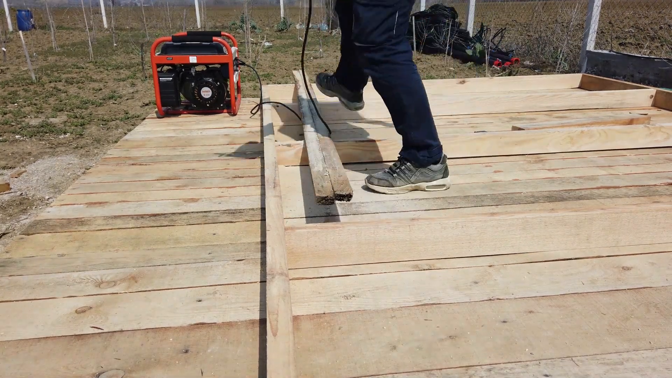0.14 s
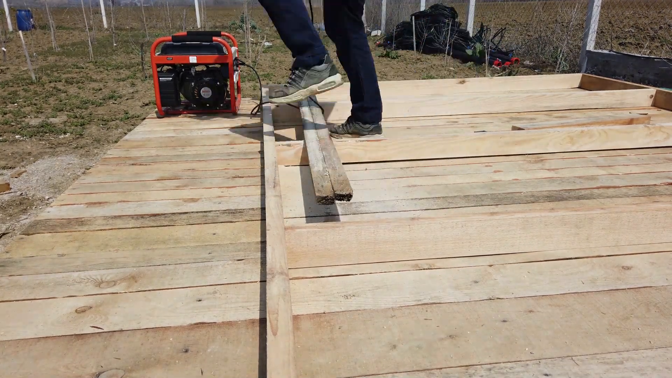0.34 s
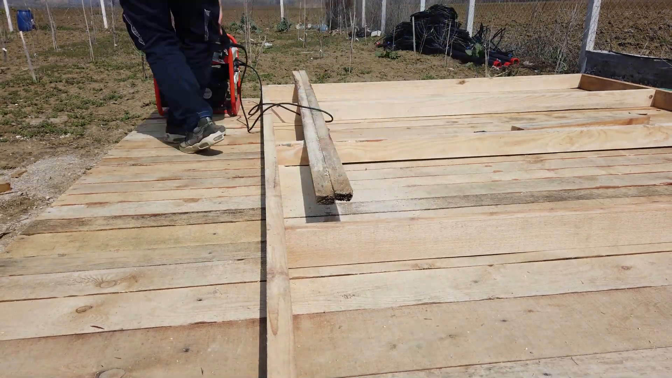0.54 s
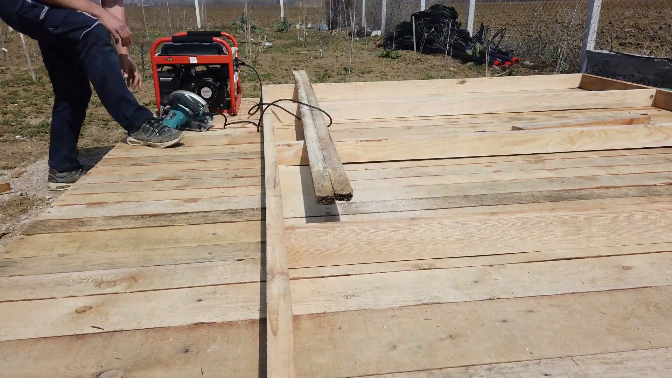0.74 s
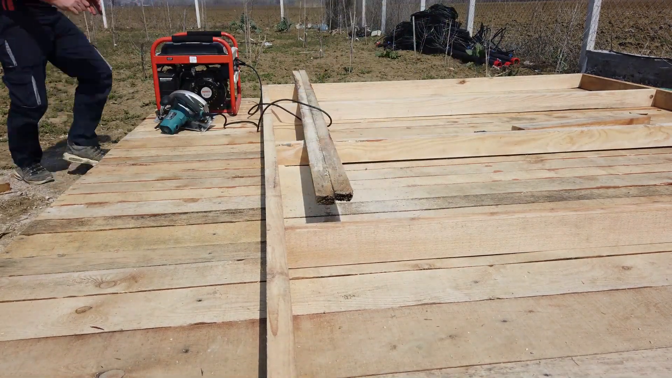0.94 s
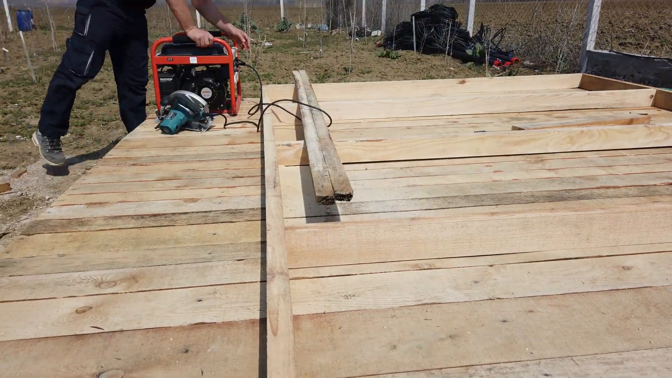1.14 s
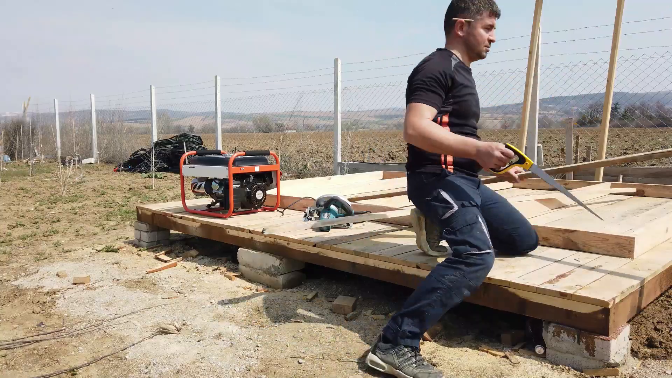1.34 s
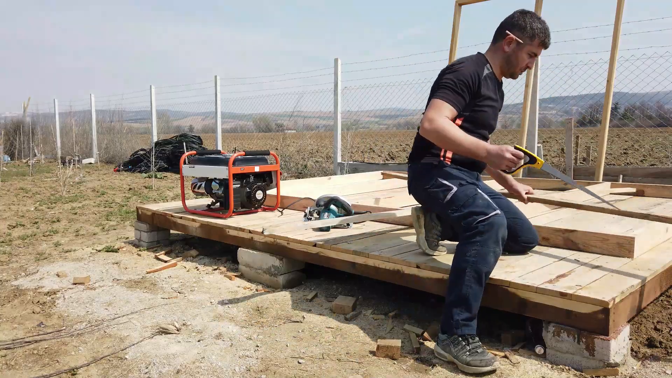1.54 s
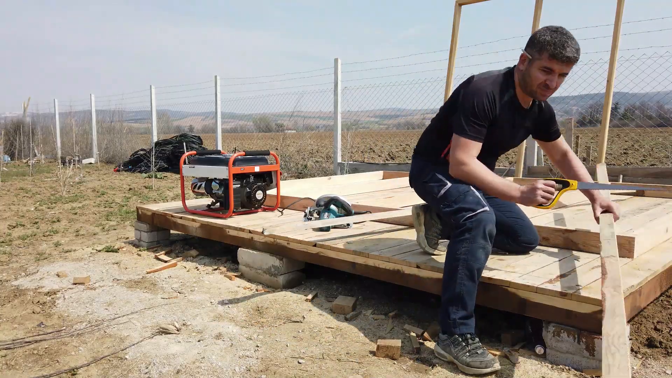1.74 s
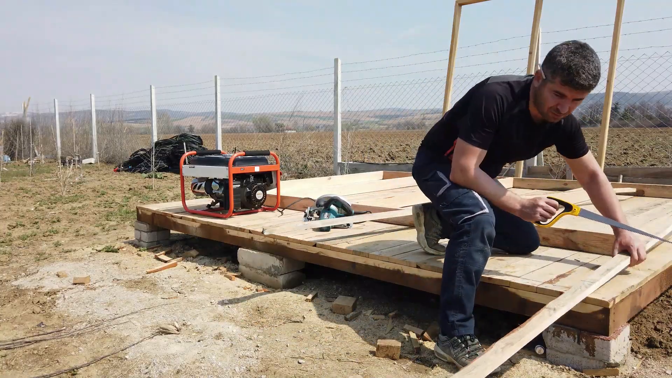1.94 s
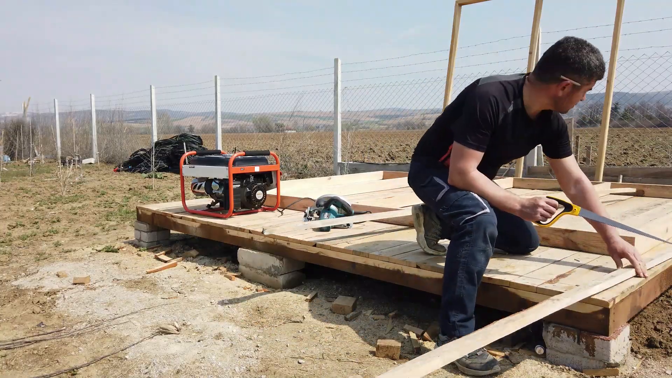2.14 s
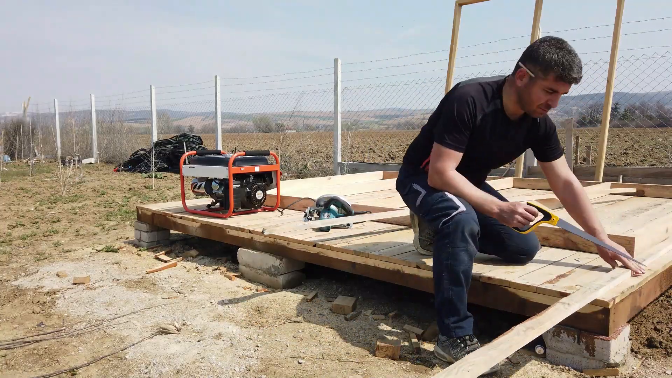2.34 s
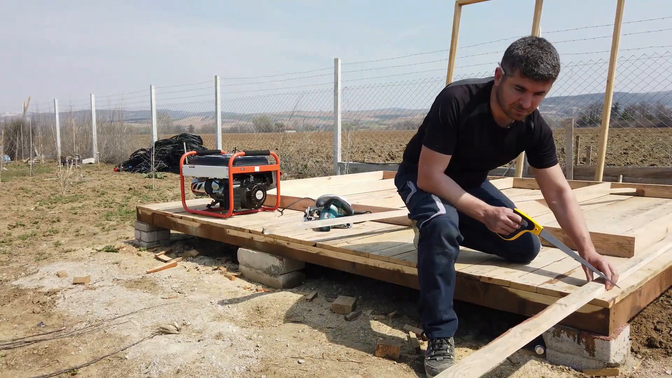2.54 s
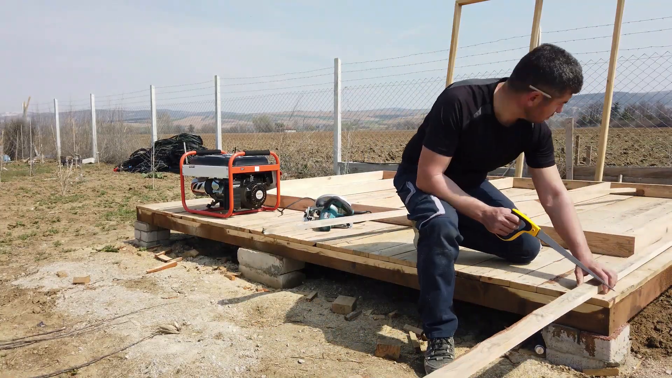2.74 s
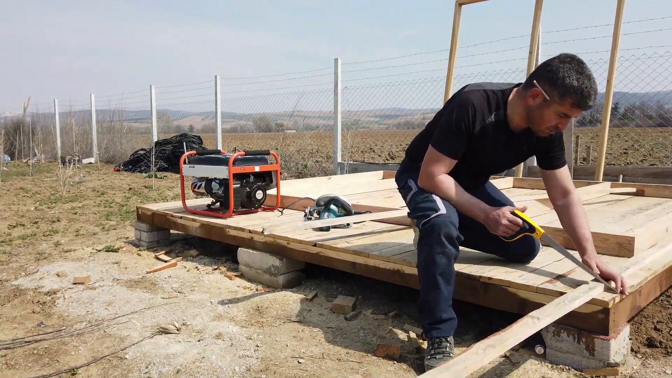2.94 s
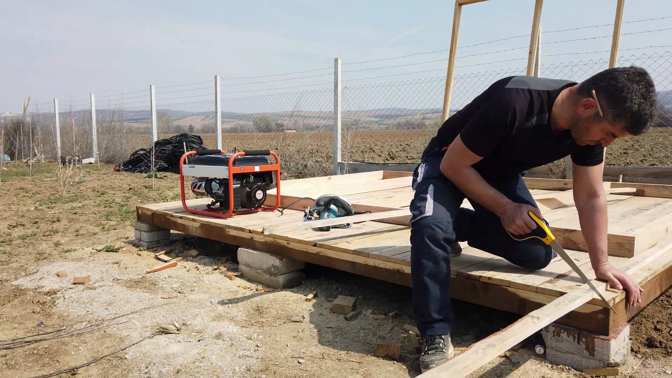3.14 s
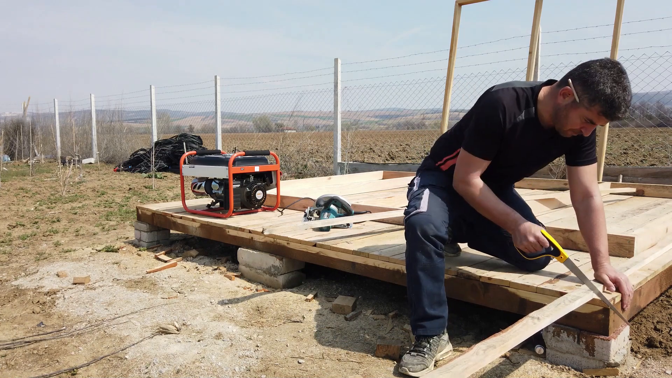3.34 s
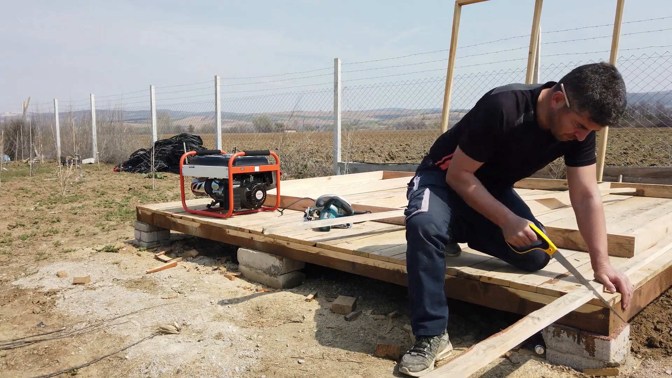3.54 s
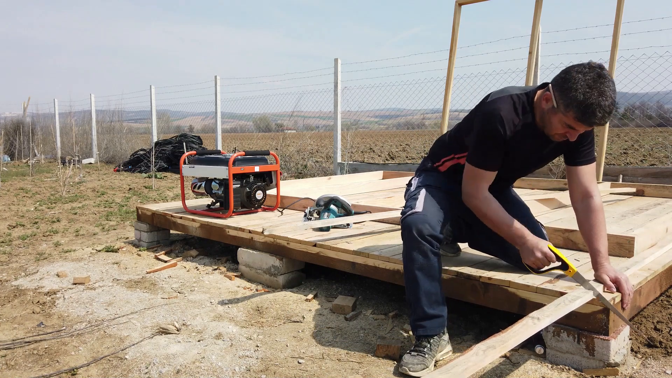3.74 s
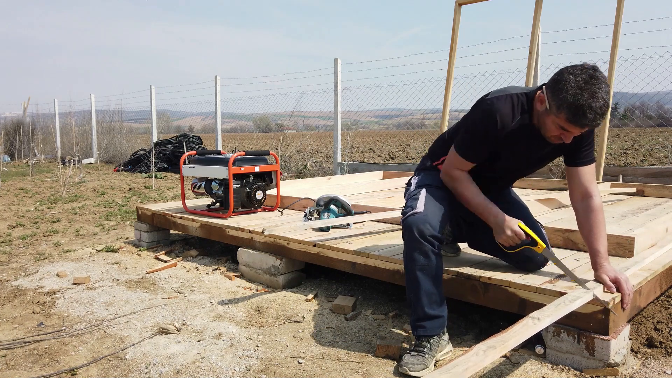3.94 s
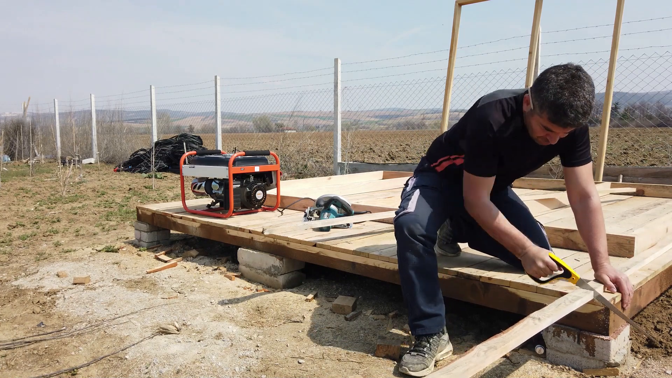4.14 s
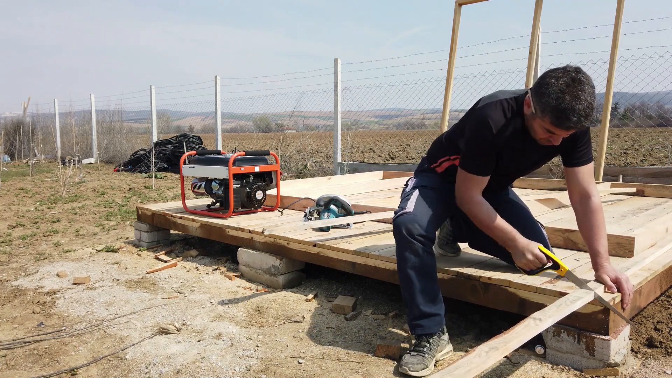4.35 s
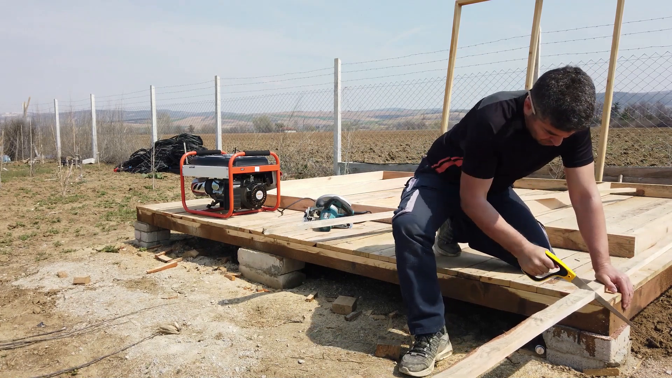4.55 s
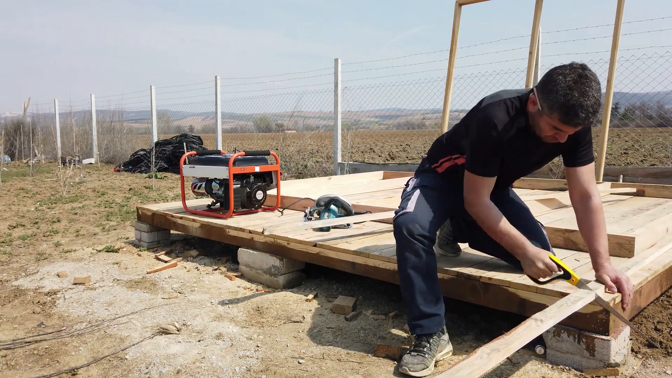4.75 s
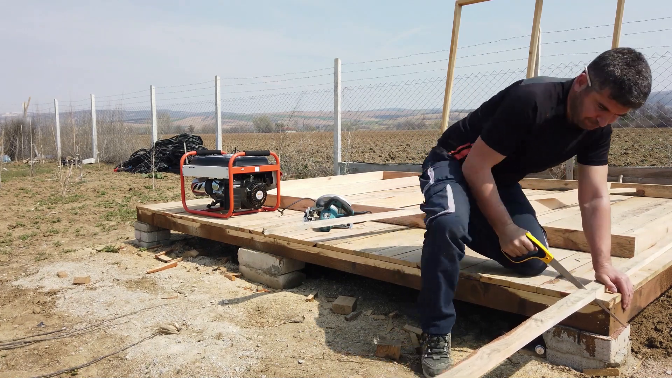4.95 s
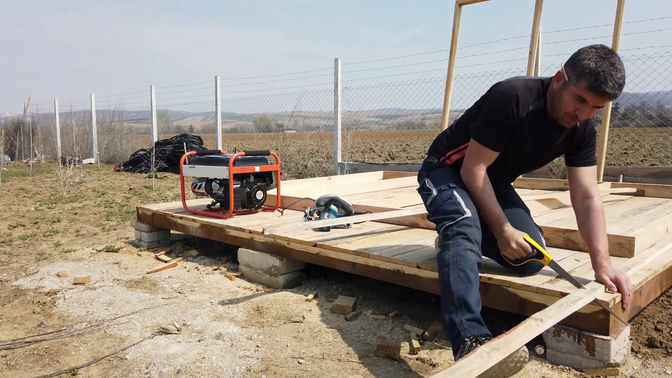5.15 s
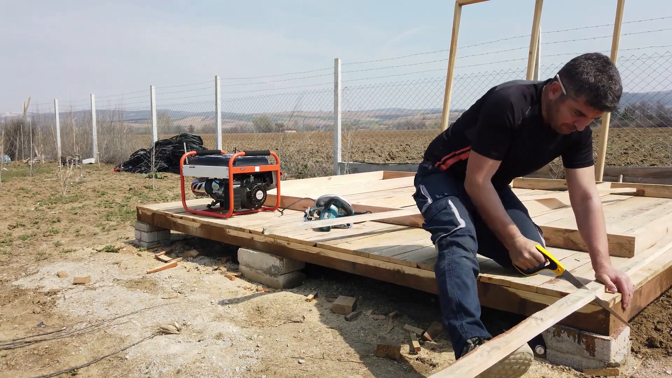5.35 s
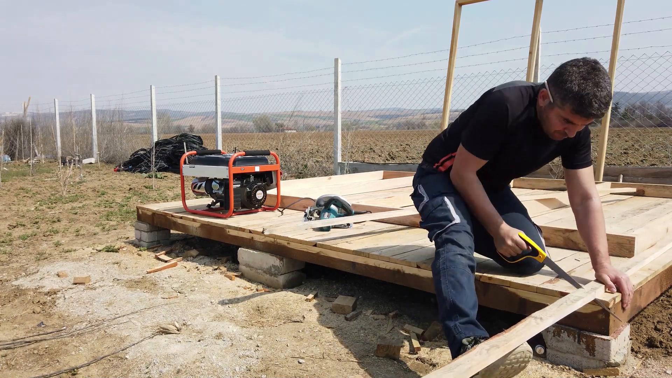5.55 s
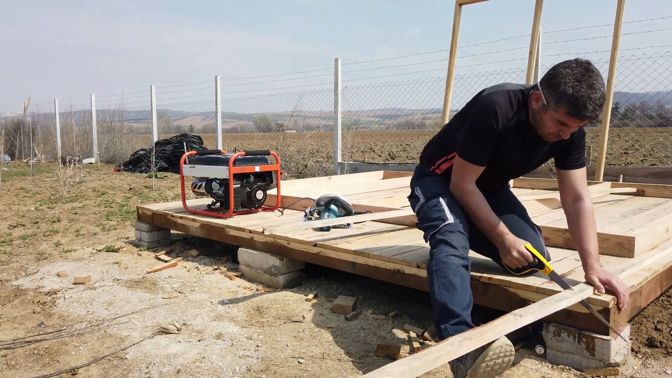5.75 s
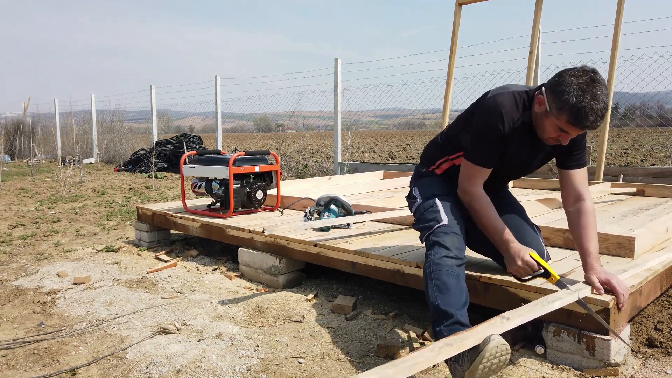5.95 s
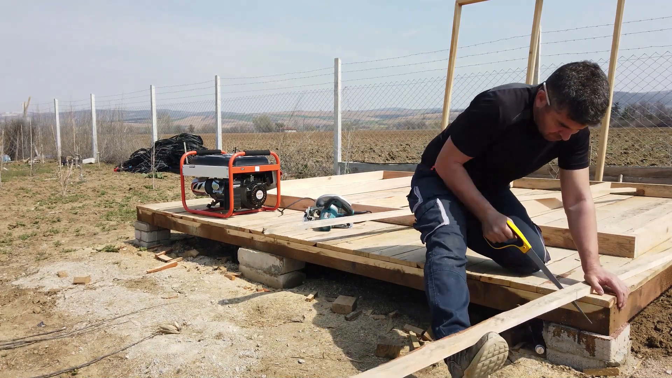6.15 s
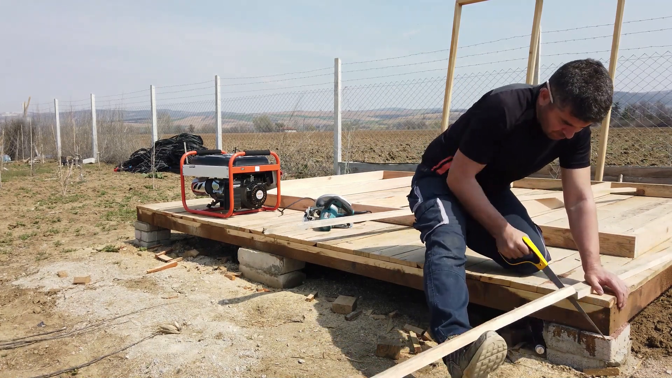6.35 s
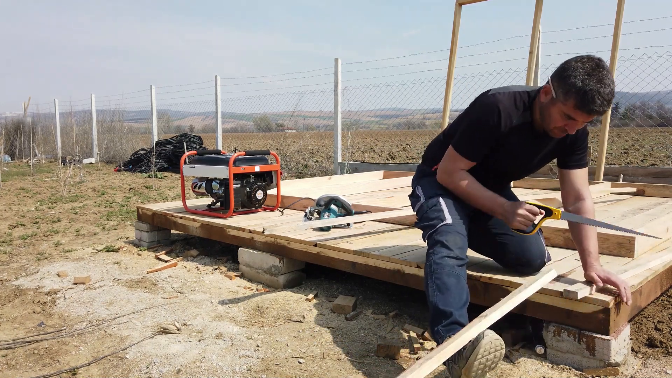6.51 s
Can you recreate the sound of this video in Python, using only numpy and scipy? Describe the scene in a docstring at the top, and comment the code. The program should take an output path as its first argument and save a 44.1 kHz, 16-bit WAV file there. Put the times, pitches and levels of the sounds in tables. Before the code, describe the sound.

Footsteps and a tool set down on wooden planks sound over a swelling generator burr for about a second. It cuts out, leaving faint wind and a very distant engine drone. Knocks and a small scrape of timber come next, then fast handsawing, about twelve strokes a second, coarse pushes and higher singing pulls. A stumbling pause with dull foot thumps, a last hollow-sounding burst, a crack and a small tick. Dry outdoor space.

```python
"""Handsawing beside a petrol generator

A saw cuts a board on a deck: its teeth pluck the wood, with loud rasping pushes and thin singing pulls.
A petrol generator hums first, built from harmonics and throbbing noise; it swells and is cut off.
A man steps over the planks, lays the board down and later saws through: short blows ring the timber.
His pause, shifting foot and sliding board are shaped noise; the dragged board sings.
Open air adds a low rumble of breeze, a faint hiss and a far engine's drone that sinks in pitch.
"""
import sys
import numpy as np
from scipy import signal
from scipy.fft import rfft, irfft, next_fast_len
from scipy.io import wavfile
from scipy.ndimage import map_coordinates

SR = 44100
rng = np.random.default_rng(int(sys.argv[2]) if len(sys.argv) > 2 else 0)


def master_out(mix):
    """Clip the mix to full scale and print it as 16-bit PCM to the path in sys.argv[1]."""
    frames = np.transpose(np.atleast_2d(mix))
    ceiling = np.clip(frames, -1, 1)
    pcm = np.round(ceiling * 32767).astype(np.int16)
    wavfile.write(sys.argv[1], SR, pcm)


N = 290178
TIME = np.arange(N) / SR
SIZE = next_fast_len(N + SR // 2, real=True) // 2 * 2  # padded length for filtering
HZ = np.fft.rfftfreq(SIZE, 1 / SR)
TOP_HZ = 16000

# Levels in the tables are relative: the functions below may add further gain.
# Saw strokes, a push and the pull back.
# Each row: middle of the push in seconds, push level in dB, pull level in dB, tooth tone of the pull in dB.
STROKES = [(3.322, -48, -51.5, -22), (3.4, -41.5, -35.5, -10), (3.471, -36.5, -38.5, -18),
           (3.54, -32.5, -40, -15), (3.618, -31.5, -35.5, -12), (3.698, -30.5, -39, -10),
           (3.776, -29, -39.5, -10), (3.857, -27.5, -38.5, -11), (3.938, -27.5, -42, -17),
           (4.024, -26.5, -42.5, -14), (4.109, -29, -41, -15), (4.191, -28, -42.5, -11),
           (4.271, -26, -43, -12), (4.359, -30, -42.5, -16), (4.458, -28, -43, -18),
           (4.561, -27.5, -43, -16), (4.665, -28, -40.5, -14), (4.772, -28, -40.5, -9),
           (4.875, -31, -40, -10), (4.983, -44.5, -74, -20), (5.365, -49, -48.5, -20),
           (5.45, -40.5, -49.5, -20), (5.544, -33, -42.5, -20), (5.628, -30.5, -51.5, -20),
           (5.725, -62, -82, -20), (5.814, -48.5, -67.5, -20), (5.918, -47, -48.5, -20),
           (5.997, -36.5, -41.5, -20), (6.073, -28.5, -41, -16), (6.148, -26.5, -36.5, -10),
           (6.231, -25.5, -38, -11), (6.346, -33.5, -45.5, -20)]
# Colour of the pushes, then of the pulls. Each row: frequency in Hz, level in dB.
PUSH_COLOUR = [(100, -45.5), (420, -20), (540, -10), (640, -4.5), (1100, -6), (2200, -6), (2750, -13.5),
               (4200, -7.5), (7000, -12), (8500, -18), (11000, -16.5), (12200, -22), (15800, -31.5)]
PULL_COLOUR = [(100, -24.5), (400, -21), (800, -8.5), (1000, -6), (1400, -6.5), (2500, -11), (4200, -10.5),
               (5800, -14), (7000, -9.5), (8500, -20), (11000, -18.5), (15800, -39)]
# Resonances of the board and the blade, first in a fresh cut and then in a deep one.
# Each row: frequency in Hz, width in Hz, lift in dB, before the scatter from stroke to stroke.
BOARD_FRESH = [(690, 60, 13), (948, 70, 7), (1030, 99, 3.5), (1283, 65, 10.5), (1687, 130, 14.5),
               (1813, 27, 5.5), (2104, 175, 10), (2477, 120, 11.5), (3130, 290, 10), (4180, 110, 6.5),
               (5050, 150, 2)]
BOARD_DEEP = [(579, 76, 14), (683, 55, 21), (890, 34, 10), (1150, 130, 4.9), (1393, 104, 11.4),
              (2106, 108, 15), (2215, 70, 6), (2970, 340, 13), (3990, 82, 8.1), (4910, 400, 8),
              (9100, 460, 8.7)]
BLADE_FRESH = [(710, 210, 4.2), (1020, 140, 2.4), (2134, 106, 18.8), (2930, 31, 3.1), (3980, 390, 4.5)]
BLADE_DEEP = [(690, 79, 5), (1040, 100, 6.2), (2120, 180, 2.5), (2983, 190, 8), (3730, 350, 8),
              (5000, 500, 6)]
# The board loosens between these two times, in seconds.
LOOSENING = (5.62, 6.09)
# How sharply the teeth bite. Each row: time in seconds, treble level in dB.
KEENNESS = [(3.3, -3.5), (3.7, -.3), (4.1, .8), (4.4, 2.8), (4.9, 2), (5.5, 2.5), (6.3, -2)]
PUSH_S, LIGHT_DB, LINGER_S_PER_DB = .052, -34, .0019  # pushes lighter than LIGHT_DB last longer
PULL_AT, PULL_SHARE, SLOWEST_S = .495, .45, .135  # pull's middle and length per cycle; longest cycle
LATE_PULL_SHARE = .62  # in a deep cut the blade rubs for longer
DETUNE, RING_SCATTER_DB = .009, 1.6  # the blade sits differently in the cut on every stroke

# The generator's hum. Each row: multiple of the hum pitch, level in dB.
HUM_HARMONICS = [(1, -6.5), (2, 3.5), (3, -6.5), (4, 0), (5, 1.5), (6, -3), (7, -9), (8, -13), (9, -18.5),
                 (10, -40.5), (11, -8.5), (12, -10), (13, -10.5), (14, -22.5), (15, -27), (16, -20),
                 (17, -12.5), (18, -8.5), (19, -12), (20, -21.5)]
# Whine of its alternator. Each row: multiple of the hum pitch, level in dB.
WHINE_HARMONICS = [(18, -9), (27, -4), (28, -7), (33, 0), (34, -8), (35, 1), (36, -3), (37, -3), (38, -7),
                   (45, -10), (52, -8), (53, -12)]
# Noise of its cooling air. Each row: frequency in Hz, level in dB.
FAN_COLOUR = [(30, -12), (80, -9), (180, 2), (350, 0.5), (560, -3.5), (800, -4), (1050, -12.5),
              (1400, -14.5), (2200, -9), (3500, -6.5), (5200, -6.5), (6600, -8), (10000, -10.7),
              (15800, -13.5)]
# Resonances of its casing. Each row: frequency in Hz, width in Hz, lift in dB.
CASING_RESONANCES = [(830, 70, 2), (1370, 150, 3), (1570, 70, 1), (2720, 220, 2.5), (4250, 250, 6),
                     (5200, 630, 7.5), (7720, 130, 7), (13380, 500, 1.5)]
# Swelling of the hum, then of the casing noise and whine. Each row: time in seconds, level in dB.
HUM_SWELL = [(0, -59), (.15, -55.5), (.3, -53), (.44, -52.5), (.49, -47.5), (.6, -47), (.68, -44),
             (.85, -44), (.97, -42.5), (1.2, -42.5)]
CASING_SWELL = [(0, -57), (.15, -54.5), (.4, -52), (.65, -50.5), (.82, -49.5), (.87, -47), (1.2, -46.3)]
HUM_HZ = 151.3  # average pitch
HUM_END, HUM_FADE_S = 1.198, .04  # cut-off time, and seconds to fall by 60 dB

# Steps and a tool set down on the deck. Each row: start in seconds, level in dB, brightness in Hz.
STEPS = [(.134, -43.5, 2200), (.235, -46, 1100), (.447, -36.5, 1100), (.707, -36, 900), (.7135, -40, 800),
         (.7283, -28, 1400), (.7303, -27.5, 1100), (.7412, -21.5, 1900), (.7445, -30, 2500),
         (.751, -34, 900), (1.168, -36, 347), (1.205, -39.5, 890)]
# Knee, board and blade knocking on timber. Each row: start in seconds, level in dB, brightness in Hz.
KNOCKS = [(1.394, -35.5, 650), (1.3943, -41.5, 2200), (1.42, -55, 8000), (1.432, -51, 1500),
          (1.498, -53, 8000), (1.909, -45.5, 6500), (1.925, -51, 3060), (2.2376, -29.5, 3100),
          (2.2425, -31.5, 2720), (2.283, -43, 1565), (2.396, -55, 520), (3.003, -56, 850),
          (3.05, -52.5, 760), (3.166, -49, 990), (3.287, -50, 1200), (3.292, -41, 1570),
          (5.277, -63.5, 3000), (6.455, -36.5, 6550), (6.456, -47, 756)]
# The last fibres crack and free the offcut. Each row: start in seconds, level in dB, brightness in Hz.
CRACKS = [(6.3335, -34, 1500), (6.342, -29, 1400), (6.358, -33, 1300)]
# Resonances of the deck, the timber and the offcut. Each row: frequency in Hz, width in Hz, lift in dB.
DECK_RESONANCES = [(300, 53, 5), (760, 160, 7), (1370, 190, 10), (1630, 90, 8.5), (3010, 250, 6)]
TIMBER_RESONANCES = [(500, 90, 2.5), (1000, 120, 5), (1190, 38, 10), (1633, 82, 8), (2095, 220, 10.5),
                     (3790, 300, 11), (4280, 300, 6)]
OFFCUT_RESONANCES = [(608, 57, 13), (910, 30, 22), (1110, 68, 17)]

# Slides of the board and a shoe. Each row: middle in seconds, length in seconds, level in dB.
SCUFFS = [(1.95, .05, -71), (2.03, .06, -79), (2.635, 0.096, -63.5), (2.94, 0.064, -62.5),
          (5.07, .028, -66)]
# The dragged board sings. Each row: middle in seconds, length in seconds, level in dB.
BOARD_DRAG = [(2.685, .125, -72.5)]
# The man shifts his weight on the soil. Each row: middle in seconds, length in seconds, level in dB.
SHIFTS = [(3.19, 0.06, -59), (3.95, 0.28, -54), (4.18, 0.087, -49), (5.13, .18, -54.5), (5.24, .08, -46.5),
          (5.395, .11, -43.5), (5.48, .08, -51)]
# Colour of the scrapes, then of the foot's thumps. Each row: frequency in Hz, level in dB.
SCUFF_COLOUR = [(290, -21), (500, 2.5), (1240, -1.5), (1910, -5), (2530, -1), (3270, -10), (5620, -12),
                (15000, -19)]
THUMP_COLOUR = [(30, -24), (65, -1), (120, -1), (300, -5), (450, -15), (700, -31), (1500, -74)]
# Resonances of the dragged board. Each row: frequency in Hz, width in Hz, lift in dB.
DRAG_RESONANCES = [(2510, 70, 13), (3720, 76, 4)]
LUMPS_PER_S, LUMPY_DB = 35, 1.5  # a shifting foot lands unevenly

# Strength of the breeze. Each row: time in seconds, level in dB.
BREEZE_SWELL = [(0, -65.5), (.85, -59), (1.6, -68.5), (2.4, -65), (2.8, -69), (3.4, -61.5), (4.7, -62),
                (5.3, -59.5), (5.9, -62), (6.58, -58)]
# Colour of the breeze's rumble, then of the open-air hiss. Each row: frequency in Hz, level in dB.
RUMBLE_COLOUR = [(12, -50), (20, -24.5), (76, -11), (113, 1), (136, -5), (275, -5.5), (347, -12.5),
                 (387, -11), (431, -16.5), (600, -23.5), (783, -27), (1400, -38), (1950, -69.5),
                 (3300, -120)]
AIR_COLOUR = [(300, -8), (1000, 0), (2500, -3), (6000, -7), (9000, -10), (11300, -7), (13000, -11),
              (15800, -12)]
# Drone of a far engine. Each row: time in seconds, base pitch in Hz, level in dB.
DRONE = [(1.2, 198.4, -72), (1.7, 193.7, -82.5), (2.301, 186.3, -75.5), (3.0, 188.6, -89.5)]


def amp(db):
    """Decibels to gain."""
    return 10 ** (np.asarray(db) / 20)


def unit(x):
    """Scale to an rms (average strength) of 1."""
    return x / np.sqrt(np.mean(x ** 2) + 1e-20)


def curve(rows):
    """Join (seconds, value) rows into one value per sample."""
    return np.interp(TIME, *np.transpose(rows))


def wobble(rate):
    """A smooth random curve with rate knots a second."""
    knots = rng.standard_normal(int(N * rate / SR) + 4)
    fine = np.arange(0, len(knots) - 1, 1 / 8)
    return np.interp(TIME * rate, fine, map_coordinates(knots, [fine]))


def shape(points, peaks=(), hz=HZ):
    """Gain of a smooth spectrum with resonances standing on it."""
    f, db = np.transpose(points)
    db = np.interp(np.log(hz + 1), np.log(f), db)
    for centre, width, lift in peaks:
        db = db + lift / (1 + (2 * (hz - centre) / width) ** 2)
    return amp(db)


def ring(x, gain):
    """Filter of unit power in which resonances ring only after each impulse."""
    size = 2 * (len(gain) - 1)
    # folding the cepstrum forward in time gives the filter with the earliest response
    cepstrum = irfft(np.log(np.maximum(unit(gain), 1e-6)))
    cepstrum[1:size // 2] *= 2
    cepstrum[size // 2 + 1:] = 0
    response = np.exp(rfft(cepstrum))
    return irfft(rfft(x, size) * response, size)[..., :x.shape[-1]]


def noise(gain, side_db):
    """Stereo noise of rms 1; side_db rows give its width as side minus mid in dB at each Hz."""
    width = np.array([np.ones(len(HZ)), shape(side_db)])
    mid, side = irfft(rfft(rng.standard_normal((2, SIZE))) * gain * width)[:, :N]
    return unit(np.array([mid + side, mid - side]))


def gestures(rows, power):
    """Loudness of movements that start and end at rest."""
    level = np.zeros(N)
    for middle, length, db in rows:
        inside = np.abs(TIME - middle) < length / 2
        swell = np.abs(np.cos(np.pi * (TIME[inside] - middle) / length))
        level[inside] += amp(db) * swell ** power
    return level


def outdoors(x, echo_db=-18, t60=.17, wide_t60=.0067):
    """The deck and ground scatter a brief echo; mostly the treble differs between the ears."""
    t = np.arange(SR // 6) / SR
    decay = amp(-60 * t / np.array([[t60], [wide_t60]]))
    tails = rng.standard_normal((2, len(t))) * decay * (t > .001)
    tails = tails / np.linalg.norm(tails, axis=1, keepdims=True)
    echo, wide = signal.fftconvolve(x[None], tails, axes=1)[:, :N]
    width = shape([(250, -30.5), (1000, -52), (2000, -36.5), (4000, -13.5), (8000, -3), (12000, 3.5)])
    side = irfft(rfft(wide * wobble(400), SIZE) * width)[:N]
    mid = x + amp(echo_db) * echo
    return np.array([mid + side, mid - side])


def saw(edge_hz=2600, snag_db=1.2, chirp_db=-1.5):
    """Pushes bite and shake the board; on pulls the teeth skate in a rising chirp and the blade sings."""
    forward, backward = arm()
    sing_db = np.interp(TIME, backward[:, 0], np.array(STROKES)[:, 3])
    bite = teeth(forward, first_hz=600, fastest_hz=1280, fastest_at=.68, scatter=.11,
                 uneven_db=4.6, tear_db=-7.5, tone_db=-26)
    skate = teeth(backward, first_hz=800, fastest_hz=1230, fastest_at=.95, scatter=.04,
                  uneven_db=5.0, tear_db=-3.5, tone_db=sing_db + chirp_db)
    pushes = resonate(bite, forward, PUSH_COLOUR, BOARD_FRESH, BOARD_DEEP,
                      fresh_db=-1.5, deep_db=-2, power=2.5, sag=.015)
    pulls = resonate(skate, backward, PULL_COLOUR, BLADE_FRESH, BLADE_DEEP,
                     fresh_db=-1.5, deep_db=-2.5, power=1.1, sag=.025)
    cut = pushes + pulls
    dull = signal.sosfiltfilt(signal.butter(2, edge_hz, fs=SR, output="sos"), cut)
    treble_gain = amp(curve(KEENNESS) + snag_db * wobble(110))
    return outdoors(dull + treble_gain * (cut - dull))


def arm():
    """Pushes and pulls as (middle s, length s, dB); a pull falls about halfway to the next push."""
    s, push_db, pull_db, _ = np.transpose(STROKES)
    cycle = np.minimum(np.diff(s, append=np.inf), SLOWEST_S)
    push_s = PUSH_S + LINGER_S_PER_DB * np.maximum(LIGHT_DB - push_db, 0)
    share = np.interp(s, LOOSENING, [PULL_SHARE, LATE_PULL_SHARE])
    forward = np.transpose([s, push_s, push_db])
    backward = np.transpose([s + PULL_AT * cycle, share * cycle, pull_db])
    return forward, backward


def teeth(strokes, first_hz, fastest_hz, fastest_at, scatter, uneven_db, tear_db, tone_db):
    """Teeth pluck the wood at a rate that follows the hand's speed; torn fibres crackle in between."""
    rate = np.full(N, float(first_hz))
    for middle, length, _ in strokes:
        inside = np.abs(TIME - middle) < length / 2
        progress = (TIME[inside] - middle) / length + .5
        speed = np.sin(np.pi / 2 * progress / fastest_at) ** 2
        rate[inside] = first_hz + (fastest_hz - first_hz) * speed
    # the hand's pace is never even
    rate = rate * np.exp(.04 * wobble(15) + .025 * wobble(120))
    passed = np.cumsum(rate) / SR  # teeth gone by so far
    at = np.flatnonzero(np.diff(np.floor(passed)))
    chance = rng.standard_normal((len(at), 2))
    shift = np.round(chance[:, 0] * scatter * SR / rate[at]).astype(int)
    at = np.clip(at + shift, 0, N - 1)
    strength = amp(uneven_db * np.minimum(chance[:, 1], 1.5))
    plucks = unit(np.bincount(at, strength, N))
    fibres = unit(rng.standard_normal(N) * amp(wobble(1500)))
    # the blade rocks once per tooth
    tone = amp(tone_db + 2.5 * wobble(90)) * np.cos(2 * np.pi * passed)
    return amp(1.2 * wobble(130)) * (blade_echo(plucks + amp(tear_db) * fibres) + tone)


def blade_echo(x, delay=.0022, wander=.05, returned=.56):
    """Bending waves return from the blade's end; its free length varies, so treble ridges shift."""
    # in a thin plate high notes travel faster, which smears each tooth's click
    x = irfft(rfft(x, SIZE) * np.exp(-1.3j * np.sqrt(HZ)), SIZE)[:N]
    lag = delay * np.exp(wander * wobble(14))
    treble = signal.sosfilt(signal.butter(2, 2600, "high", fs=SR, output="sos"), x)
    echoes = sum(returned ** k * np.interp(TIME - k * lag, TIME, treble) for k in range(1, 4))
    return unit(x + echoes)


def resonate(drive, strokes, colour, fresh, deep, fresh_db, deep_db, power, sag):
    """Each stroke swells, rings its own variant of the resonances, and bends them as the blade travels."""
    t = np.arange(8192) / SR
    hz = np.fft.rfftfreq(len(t), 1 / SR)
    out = np.zeros(N + SR)
    drive = np.pad(drive, (0, SR))

    def varied(modes):
        """Scatter the pitch and lift of each resonance."""
        scattered = [(f * (1 + DETUNE * rng.standard_normal()), width,
                      lift + RING_SCATTER_DB * rng.standard_normal()) for f, width, lift in modes]
        return unit(shape(colour, scattered, hz))

    for middle, length, db in strokes:
        start = round((middle - length / 2) * SR)
        progress = np.minimum(t / length, 1)
        swell = np.abs(np.sin(np.pi * progress)) ** power
        rub = drive[start:][:len(t)] * amp(db) * swell
        # a deep cut frees the board's low mode and damps the blade
        loose = np.interp(middle, LOOSENING, [0, 1])
        gain = (1 - loose) * varied(fresh) + loose * varied(deep)
        sound = amp(fresh_db + loose * (deep_db - fresh_db)) * ring(rub, gain)
        # reading the sound at warped times bends its pitch
        bent_time = t + sag * length * progress * (1 - progress)
        out[start:][:len(t)] += map_coordinates(sound, [SR * bent_time])
    return out[:N]


def generator(fan_db=3.3, whine_db=-3.5, throb=.45, swing_db=.5, muffler_lag=.13, whine_smear=1.6,
              throb_hz=2600):
    """Exhaust pulses made of harmonics, alternator whine, and casing noise that throbs with the pulses."""
    phase = 2 * np.pi * np.cumsum(HUM_HZ * (1 + .0008 * wobble(25))) / SR

    def partial(k, smear):
        """One harmonic; the muffler holds higher ones back, so each pulse is a short rising burr."""
        return np.cos(k * phase - muffler_lag * k ** 2 + smear * rng.standard_normal())

    def lines(orders, smear):
        """A set of harmonics that waver in level."""
        return unit(sum(amp(db + swing_db * wobble(16.45)) * partial(round(k), smear) for k, db in orders))

    fan = noise(shape(FAN_COLOUR, CASING_RESONANCES),
                [(100, -2.5), (300, -1.5), (1000, -11.5), (4000, -51.5), (8000, -22), (12000, -20.5)])
    low = signal.sosfiltfilt(signal.butter(2, throb_hz, fs=SR, output="sos"), fan)
    # the shaft turns at a third of the hum's pitch; the hiss flutters with it, and once and twice per pulse
    flutter = 1 + .2 * np.cos(2 * phase) + .12 * np.cos(phase) + .1 * np.cos(phase / 3)
    fan = low * (1 + throb * np.cos(phase)) + (fan - low) * flutter
    whine = lines(WHINE_HARMONICS, whine_smear)
    casing = amp(curve(CASING_SWELL)) * (amp(fan_db) * fan + amp(whine_db) * whine)
    hum = amp(curve(HUM_SWELL)) * lines(HUM_HARMONICS, smear=0)
    cut_off = amp(-60 * np.maximum(TIME - HUM_END, 0) / HUM_FADE_S)
    return cut_off * (hum + casing)


def knocks(rows, modes, level_db, rattle, rattle_s, steep):
    """A blow and a short rattle ring the wood; soft contacts are dull and rattle longer, hard ones lack bass."""
    out = np.zeros(N + SR)
    t = np.arange(SR // 5) / SR
    hz = np.fft.rfftfreq(len(t), 1 / SR)
    wood = shape([(40, -20.5), (300, 0), (1500, -2.5), (12000, 7.5)], modes, hz)
    for s, db, bright_hz in rows:
        t60 = rattle_s * (1000 / bright_hz) ** .35  # rattle_s holds at a brightness of 1000 Hz
        blow = (t == 0) + rattle * rng.standard_normal(len(t)) * amp(-60 * t / t60)
        contact = hz / (hz + .66 * bright_hz) / (1 + (hz / bright_hz) ** steep)
        hit = ring(blow, wood * contact)
        out[round(s * SR):][:len(t)] += amp(db + level_db) * hit / np.abs(hit).max()
    return outdoors(out[:N])


def shuffling(thump_db=-1):
    """Light scrapes of timber and the dull thumps of a foot finding its place, as shaped noise."""
    def slide(rows, modes, power):
        """Rough noise that follows the movement."""
        rough = amp(2.3 * wobble(200))
        return gestures(rows, power) * rough * noise(shape(SCUFF_COLOUR, modes), [(1000, -58.5), (10000, -7)])

    scrapes = slide(SCUFFS, [], power=1.6) + slide(BOARD_DRAG, DRAG_RESONANCES, power=.6)
    lumps = amp(LUMPY_DB * wobble(LUMPS_PER_S))
    thumps = gestures(SHIFTS, power=.8) * lumps * noise(shape(THUMP_COLOUR), [(60, 2.5), (400, -7)])
    return scrapes + amp(thump_db) * thumps


def breeze(rumble_db=-1, air_db=-83):
    """A low uneven rumble under a very faint, even hiss, both of shaped noise."""
    strength = amp(curve(BREEZE_SWELL) + rumble_db + 1.1 * wobble(7.2))
    rumble = strength * noise(shape(RUMBLE_COLOUR), [(40, 3.5), (120, -14), (400, -23.0)])
    return rumble + amp(air_db) * noise(shape(AIR_COLOUR), [(1000, -6.5), (8000, -2)])


def far_engine():
    """A faint drone of harmonics 2 to 4 sinks in pitch and fades."""
    s, hz, db = np.transpose(DRONE)
    phase = 2 * np.pi * np.cumsum(np.interp(TIME, s, hz)) / SR
    tones = sum(amp(2.3 * wobble(4.5)) * np.sin(k * phase) for k in range(2, 5))
    return amp(np.interp(TIME, s, db)) * tones / 2


def scene():
    """All sources together."""
    steps = knocks(STEPS, DECK_RESONANCES, level_db=4.5, rattle=.03, rattle_s=.05, steep=4.5)
    timber = knocks(KNOCKS, TIMBER_RESONANCES, level_db=3.5, rattle=.1, rattle_s=.07, steep=3.63)
    offcut = knocks(CRACKS, OFFCUT_RESONANCES, level_db=0, rattle=.1, rattle_s=.04, steep=2.5)
    return saw() + generator() + steps + timber + offcut + shuffling() + breeze() + far_engine()


def record(dry):
    """Nothing is kept above the band limit."""
    return irfft(rfft(dry, SIZE) * (HZ < TOP_HZ))[:, :N]


dry = scene()
out = record(dry)
master_out(out)
```